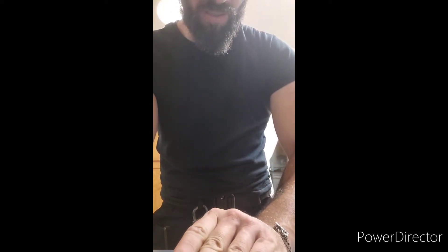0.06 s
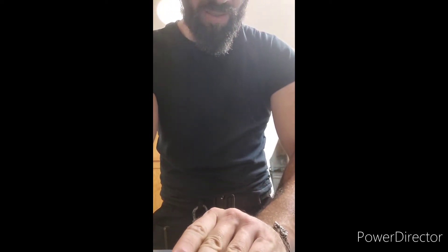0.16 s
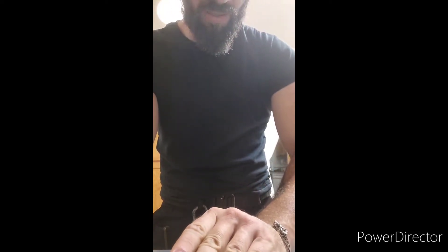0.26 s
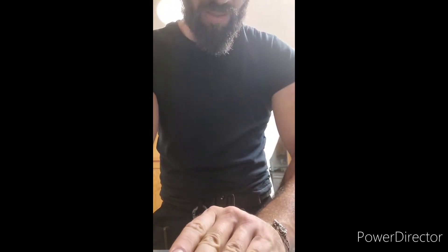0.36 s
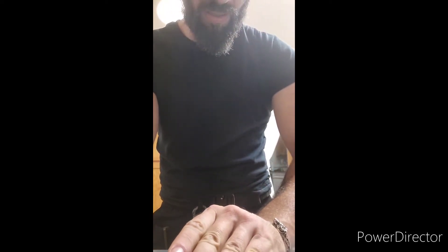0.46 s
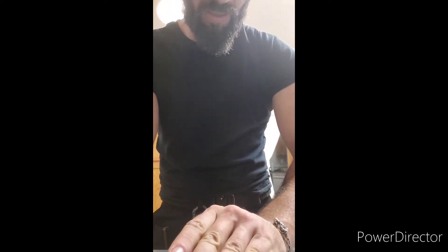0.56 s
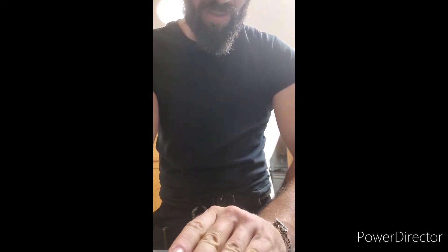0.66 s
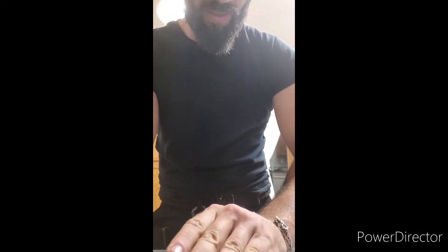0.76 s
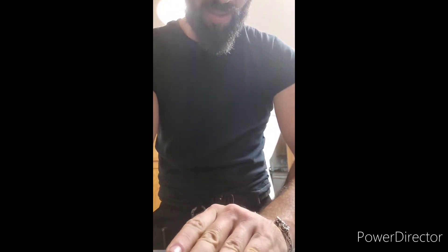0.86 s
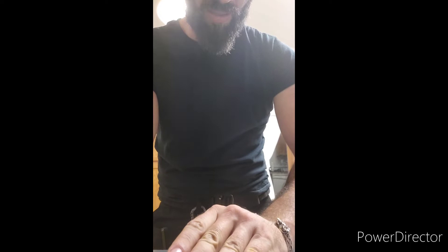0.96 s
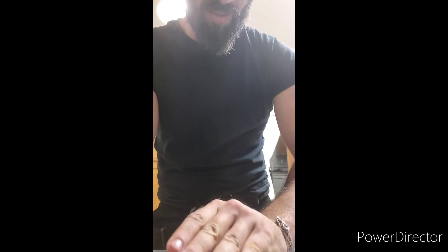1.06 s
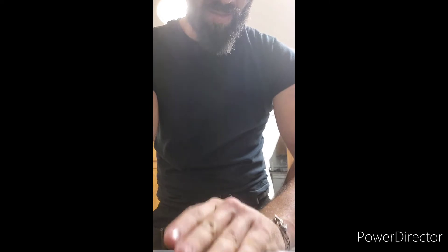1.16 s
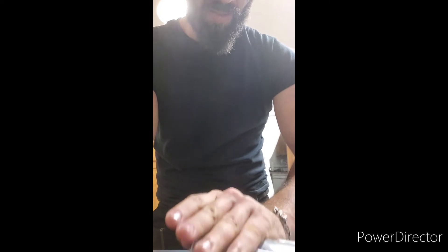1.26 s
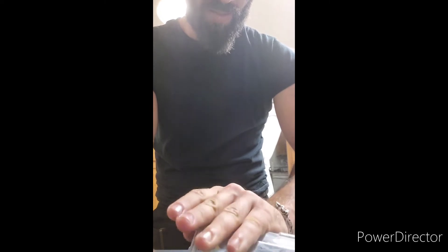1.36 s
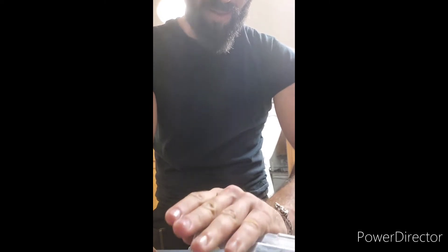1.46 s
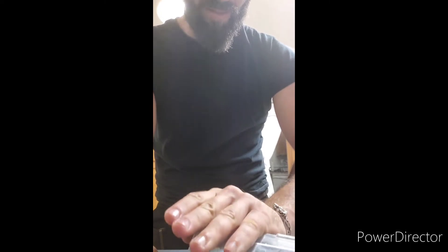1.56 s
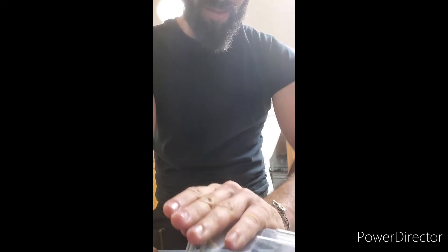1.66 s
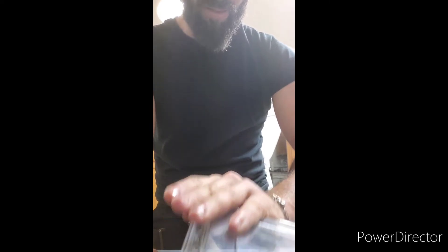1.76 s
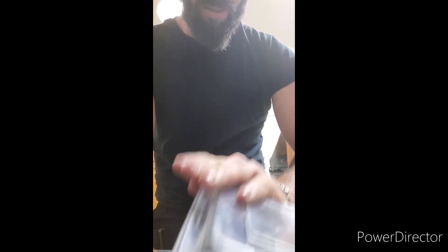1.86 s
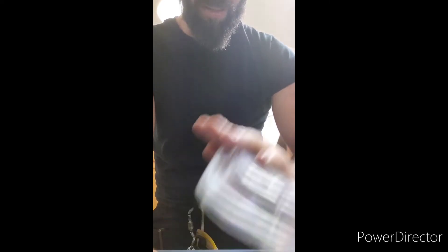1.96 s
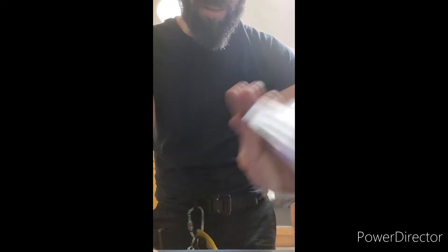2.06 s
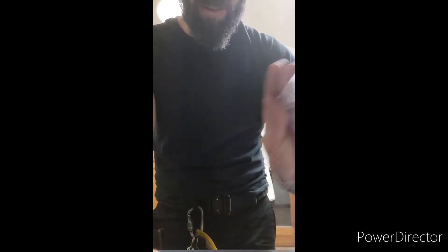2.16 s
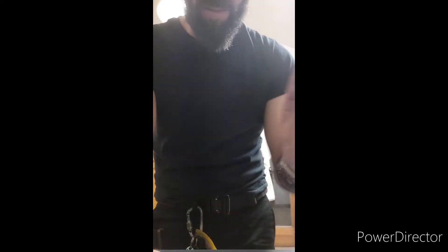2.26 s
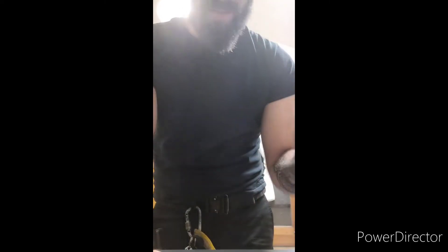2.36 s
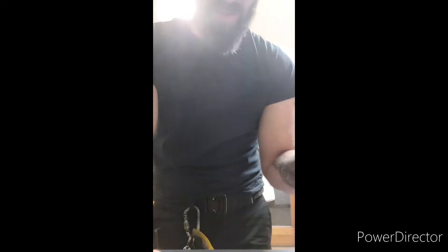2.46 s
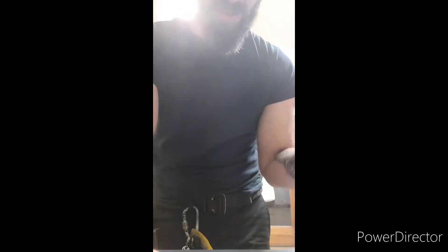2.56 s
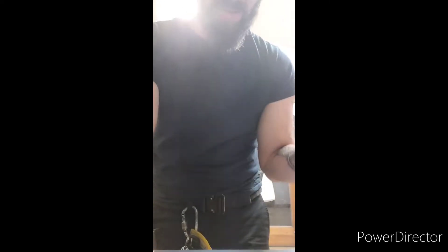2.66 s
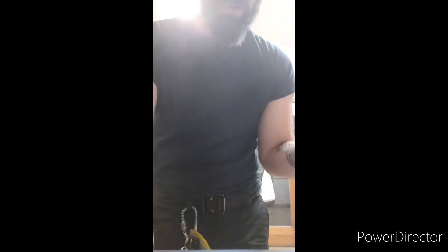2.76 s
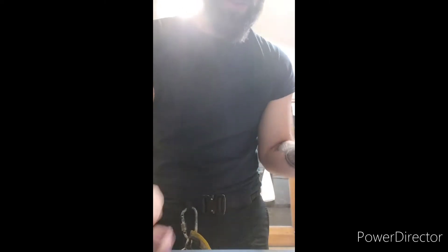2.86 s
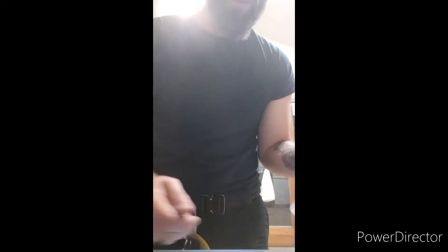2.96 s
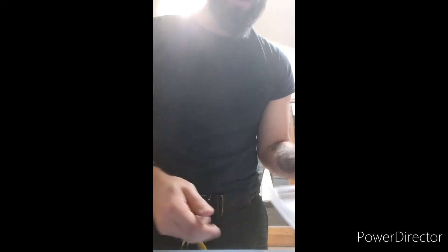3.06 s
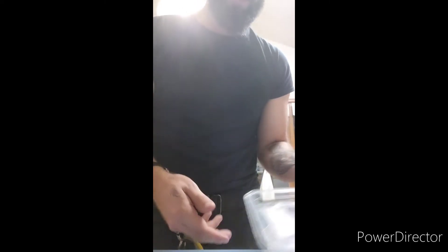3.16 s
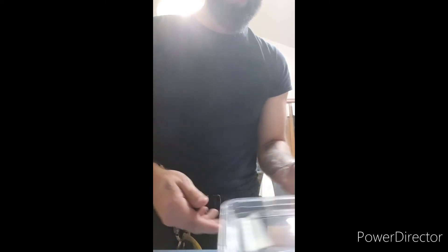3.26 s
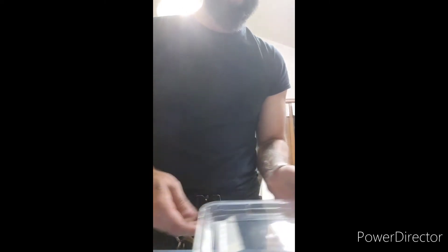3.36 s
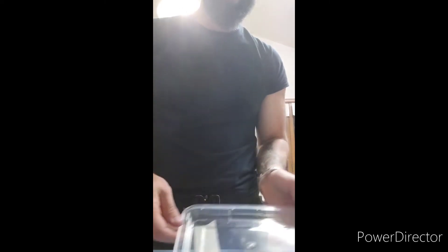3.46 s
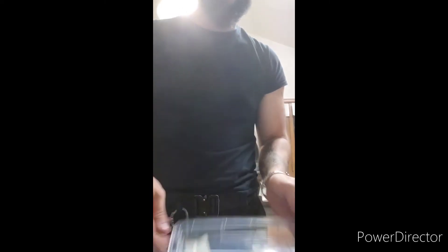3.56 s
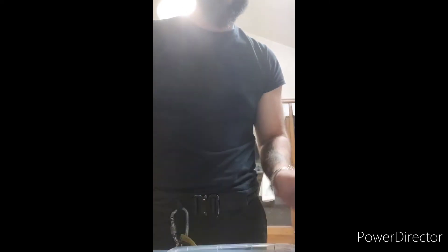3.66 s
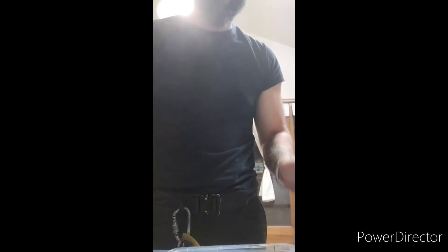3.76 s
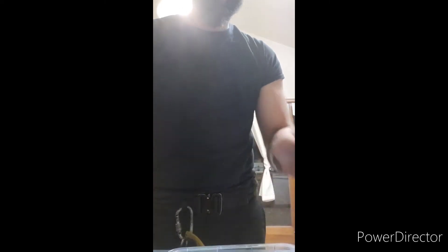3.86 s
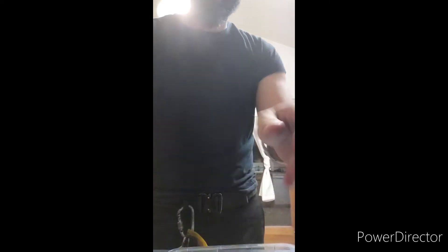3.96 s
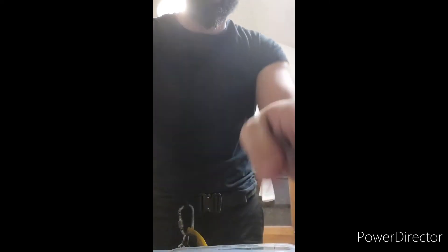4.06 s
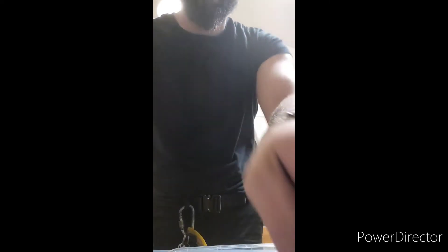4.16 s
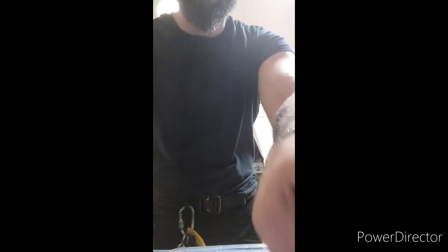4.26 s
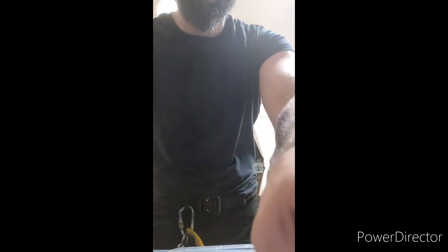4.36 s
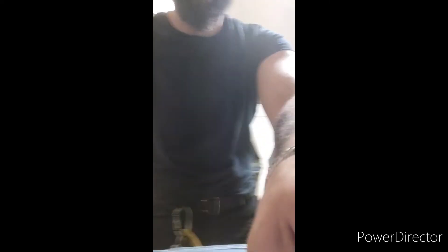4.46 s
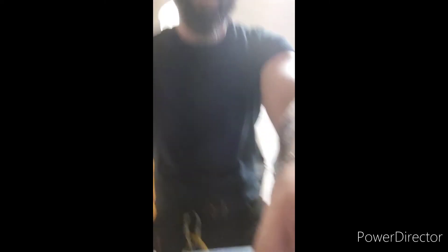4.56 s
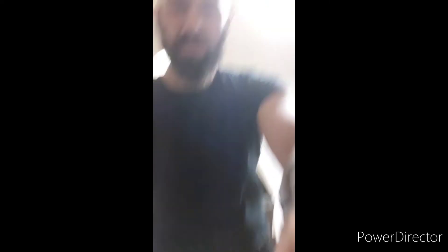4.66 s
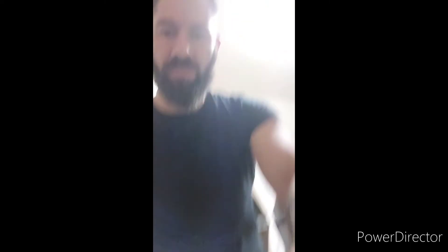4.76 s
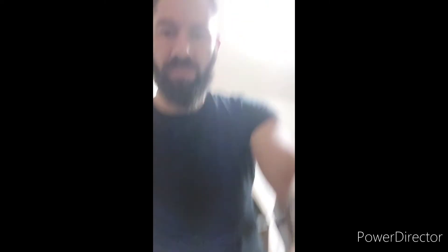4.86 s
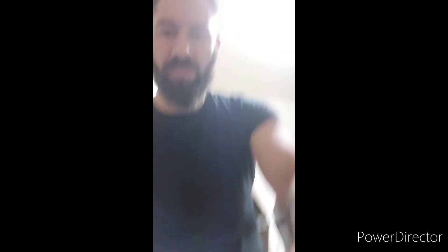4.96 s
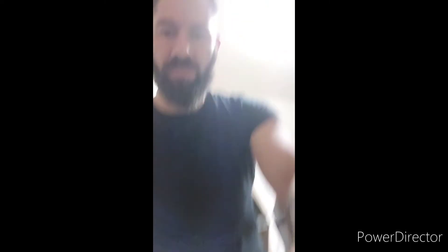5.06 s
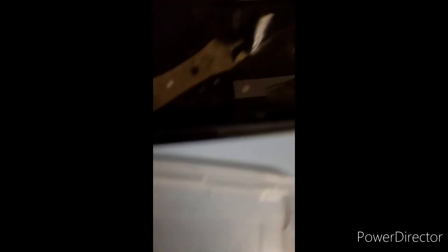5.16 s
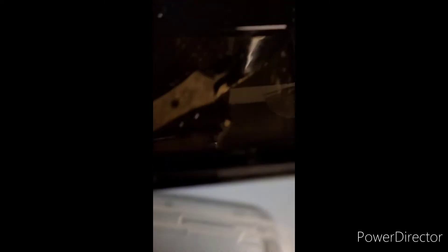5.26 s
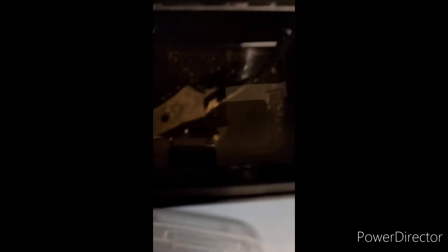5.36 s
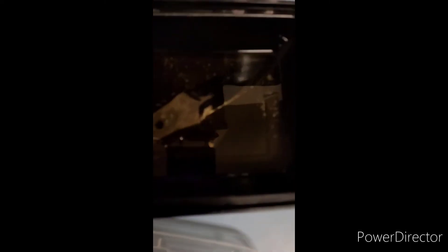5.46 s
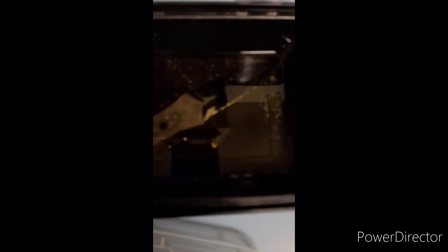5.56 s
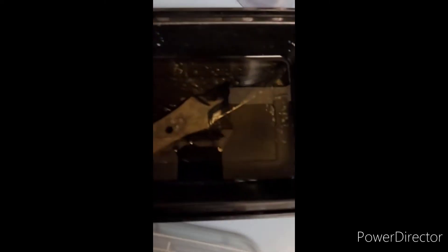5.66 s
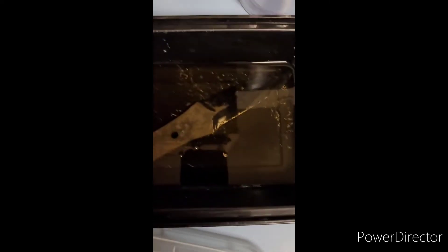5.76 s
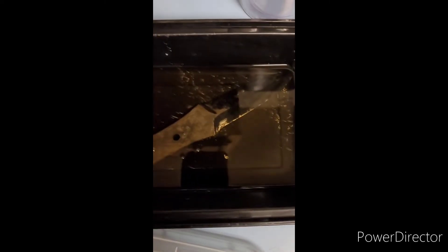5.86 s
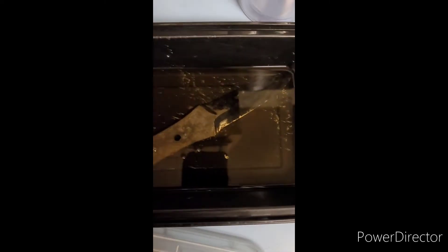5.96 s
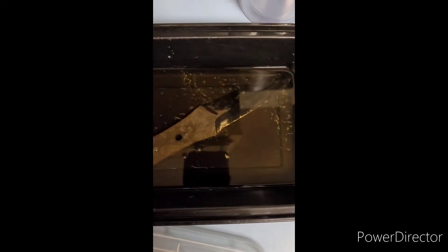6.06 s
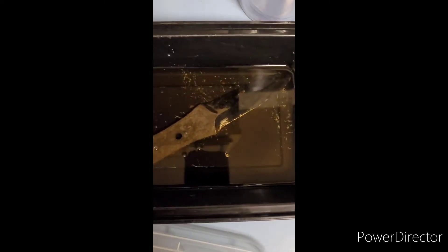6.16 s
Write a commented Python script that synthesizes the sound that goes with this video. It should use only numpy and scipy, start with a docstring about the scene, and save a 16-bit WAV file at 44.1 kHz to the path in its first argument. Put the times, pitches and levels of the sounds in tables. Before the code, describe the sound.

Brittle plastic cracks, boxy thuds and short palm squeaks come from a container opened by hand near the microphone, mostly to the right, with a short bright room echo. After the lid snaps off there are softer clatters, another tight burst of clacks, then dry, very close scratching and clicking as the phone is grabbed, fading into quiet rumble.

```python
"""In a bare room, a plastic tub is pried open by hand close to a phone: the rim cracks, the lid and walls boom
as decaying modes, and palms scrape the plastic as fluttering noise. Then a hand grips the phone: fingers rub
(noise strokes) and tick (short noise bursts with thumps) on its case by the right microphone.
Reverberation answers the tub, and a low room rumble of filtered noise lies under everything."""
import sys
import numpy as np
from scipy import signal
from scipy.fft import rfft, irfft, next_fast_len
from scipy.io import wavfile
from scipy.ndimage import uniform_filter1d, map_coordinates

SR = 44100
rng = np.random.default_rng(int(sys.argv[2]) if len(sys.argv) > 2 else 0)


def to_linear_factor(level_db):
    """Convert decibel levels (scalar or array-like) to linear amplitude factors."""
    exponent = np.asarray(level_db, float) / 20
    return 10 ** exponent


def to_wav(sig):
    """Store sig (one row per channel, or 1-D mono) as 16-bit WAV at the path in sys.argv[1].

    Samples outside -1..1 are clipped; the rate is SR.
    """
    pcm = np.clip(np.atleast_2d(sig), -1, 1) * 32767
    pcm = np.round(pcm).astype(np.int16)
    wavfile.write(sys.argv[1], SR, pcm.T)  # frames by channels


N = 273324
OPEN_S = 2.0  # the lid comes off and the walls ring higher


def unit(x):
    """Normalization: scale to rms 1."""
    return x / np.sqrt(np.mean(x ** 2) + 1e-20)


def along(points, hz):
    """Logarithmic frequency scale: (frequency [Hz], value) points joined by straight lines on it."""
    f, v = np.transpose(points)
    return np.interp(np.log(hz + 1), np.log(f + 1), v)


def curves(rows):
    """Level envelopes: gain per sample for each dB column, -120 dB outside the rows."""
    s, *columns = np.transpose(rows)
    return [to_linear_factor(np.interp(np.arange(N) / SR, s, c, -120, -120)) for c in columns]


def filtered(x, response):
    """Linear filtering: the spectrum of x times a response of frequency."""
    m = next_fast_len(x.shape[-1] + 8192)
    spectrum = rfft(x, m) * response(np.fft.rfftfreq(m, 1 / SR))
    return irfft(spectrum, m)[..., :x.shape[-1]]


def causal(db_of_hz, size=1024):
    """Minimum phase: the folded cepstrum gives an impulse response with nothing before the blow."""
    cepstrum = irfft(np.log(to_linear_factor(db_of_hz(np.fft.rfftfreq(size, 1 / SR)))))
    cepstrum[1:size // 2] *= 2
    cepstrum[size // 2 + 1:] = 0
    return irfft(np.exp(rfft(cepstrum)))


def noise(spectrum, grain_db=0, grain_hz=300):
    """Stick-slip: coloured noise of rms 1 whose level flutters at random."""
    grains = rng.standard_normal(int(N * grain_hz / SR) + 4)
    flutter = map_coordinates(grains, [np.arange(N) * grain_hz / SR])
    grainy = rng.standard_normal(N) * to_linear_factor(grain_db * flutter)
    return unit(filtered(grainy, lambda hz: to_linear_factor(along(spectrum, hz))))


def add(track, s, sound):
    """Superposition: mix a sound in from time s."""
    part = track[..., round(s * SR):][..., :sound.shape[-1]]
    part += sound[..., :part.shape[-1]]


def stroke(start, end, db_start, db_end, edge=0.012):
    """Sliding contact: the gain of one stroke, with a quick rise and fall of edge seconds."""
    held_to = max(end, start + edge)
    corners = [start, start + edge, held_to, held_to + edge]
    return np.interp(np.arange(N) / SR, corners, [0, to_linear_factor(db_start), to_linear_factor(db_end), 0])


# colour of the room tone: (frequency [Hz], relative density [dB])
RUMBLE = [(15, -63.5), (25, -43), (58, -8.5), (85, -28.5), (103, -14), (163, 1), (197, -5), (349, -7.5),
          (584, -19.5), (831, -17), (952, -21.5), (2000, -21), (6380, -22), (8600, -33), (11900, -26.5),
          (16500, -73)]
# course of the room tone: (time [s], rumble level [dB], hiss level [dB])
ROOM_TONE = [(0, -48, -67), (1.9, -51.5, -65.5), (2.9, -53, -67), (3.5, -54.5, -73.5), (4.0, -50, -64.5),
             (5.0, -51.5, -68.5), (5.65, -50, -73), (6.2, -51, -78.5)]
# left-right coherence of the room tone and the reverberation: (frequency [Hz], coherence [0 to 1])
ALIKE = [(60, 1), (500, 0.86), (1200, 0.029), (4000, 0.046)]


def room_tone():
    """Coherence of a diffuse field: distant machinery and air reach both ports nearly alike in the bass."""
    turn = lambda hz: np.arccos(np.clip(along(ALIKE, hz), 0, 1)) / 2
    mid = filtered(noise(RUMBLE), lambda hz: np.cos(turn(hz)))
    side = filtered(noise(RUMBLE), lambda hz: np.sin(turn(hz)))
    pair = np.array([mid + side, mid - side]) * to_linear_factor([[-1], [1]])
    low = filtered(pair, lambda hz: 1 / (1 + (hz / 1500) ** 4))
    rumble, hiss = curves(ROOM_TONE)  # the hiss fades as the phone turns to the table
    electronics = to_linear_factor(-87.5) * rng.standard_normal((2, N))
    return rumble * unit(low) + hiss * unit(pair - low) + electronics


# decay of the reverberation: (frequency [Hz], t60 [s])
WALLS = [(100, 0.036), (500, 0.64), (1500, 0.58), (4000, 0.55), (10000, 0.42), (15000, 0.24)]
# room level at the left port, then at the right: (frequency [Hz], level [dB])
ECHO_LEFT = [(200, -9.5), (800, -16), (2500, -17.5), (12000, -24.5)]
ECHO_RIGHT = [(200, -7), (800, -8), (2500, -17), (12000, -11)]


def room(x, size=SR // 2):
    """Reverberation: noise tails, each frequency dying at its own speed, long waves alike at both ports."""
    out = np.zeros((2, N))
    for start in range(0, N, size):  # a fresh tail every half second, since the tub moves
        hz, t, z = signal.stft(rng.standard_normal((2, SR * 5 // 8)), SR, nperseg=256)
        alike = np.clip(along(ALIKE, hz), 0, 1)[:, None]
        z[0] = alike * z[1] + np.sqrt(1 - alike ** 2) * z[0]
        decay = to_linear_factor(-60 * t / along(WALLS, hz)[:, None])
        tail = signal.istft(z * decay, SR, nperseg=256)[1]
        wet = signal.fftconvolve(x[None, start:start + size], tail / np.linalg.norm(tail[1]), axes=1)
        add(out, start / SR + .004, wet)
    return filtered(out, lambda hz: to_linear_factor([along(ECHO_LEFT, hz), along(ECHO_RIGHT, hz)]))


# finger strokes on the case: (start [s], length [s], right port [dB], left port [dB], bump [dB])
RUB = [(4.267, 0.091, -64, -77.5, -72), (4.375, 0.29, -51, -53.5, -80.5), (4.586, 0.016, -43, -38, -36.5),
       (4.609, 0.016, -22.5, -38.5, -37.5), (4.638, 0.025, -23.5, -37.5, -41),
       (4.682, 0.19, -49.5, -47.5, -55), (4.773, 0.12, -49.5, -59, -66), (4.983, 0.085, -51, -50, -54.5),
       (5.116, 0.079, -53, -56, -58.5), (5.267, 0.052, -42, -50, -51.5), (5.313, 0.16, -54.5, -53, -85),
       (5.481, 0.13, -62.5, -61.5, -84), (5.768, 0.17, -72.5, -56.5, -67.5)]
# colour of the case at each port, and of the phone shifting in the grip: (frequency [Hz], relative level [dB])
RUB_RIGHT = [(600, -8), (2000, -11), (3500, -4.5), (7300, 0.5), (8700, -10.5), (11000, -6.5), (15500, -9),
             (15900, -39)]
RUB_LEFT = [(60, 3), (300, 23), (1500, 16.5), (4000, 10), (8000, -52), (16000, -42)]
BUMP = [(20, -16.5), (55, 5), (90, -3.5), (300, -5), (1000, -59.5)]


def finger_rubs():
    """Structure-borne friction: rubbing enters each port dry and unrelated; the bump is common to both."""
    right_fade_db, left_fade_db = 1, 5  # loss over one stroke
    gritty_db = -47  # strokes lighter than this glide more smoothly
    right = sum(stroke(s, s + length, db, db - right_fade_db, edge=0.0074) for s, length, db, _, _ in RUB)
    left = sum(stroke(s, s + length, db, db - left_fade_db, edge=0.012) for s, length, _, db, _ in RUB)
    bump = sum(stroke(s, s + length, db, db, edge=0.021) for s, length, _, _, db in RUB)
    left_grain_db = 4.2 * np.minimum(left / to_linear_factor(gritty_db), 1)
    left_rub = left * noise(RUB_LEFT, grain_db=left_grain_db, grain_hz=162.0)
    right_rub = right * noise(RUB_RIGHT, grain_db=1.5, grain_hz=324)
    return np.array([left_rub, right_rub]) + bump * noise(BUMP) * to_linear_factor([[-3], [2]])


# finger ticks on the case: (time [s], level [dB], thump re tick [dB], left-right balance [dB])
TICKS = [(4.5, -25.5, -12.5, 13), (4.5949, -22.5, 1, -25), (4.6165, -12, -23.5, -44), (4.7031, -39, 19, 17),
         (4.7708, -50.5, 22.5, -9), (4.7752, -53.5, 25.5, -7.5), (4.788, -55.5, 21.5, -7),
         (5.336, -51.5, 14.5, -7), (5.3571, -34.5, -3, -6.5), (5.397, -26.5, -40, -13)]
# the grip settles in a run of ticks that fades overall, with uneven levels: (time [s])
SETTLING_S = [5.425, 5.4507, 5.489, 5.515, 5.5282, 5.567, 5.6219]


def finger_ticks():
    """Impact excitation: a short noise burst at each port, over decaying notes of the case common to both."""
    settle_db, fade_db_per_s, settle_thump_db, settle_pan_db = -31.5, 73, -27, -6
    chatter_s, chatter_db = 0.015, -7  # a weaker slip follows within this time
    out, t = np.zeros((2, N)), np.arange(SR // 20) / SR
    colour = causal(lambda f: along(RUB_RIGHT, f))
    settling = []
    for s in SETTLING_S:
        db = settle_db - fade_db_per_s * (s - SETTLING_S[0]) + rng.normal(0, 2.5)
        settling.append((s, db, settle_thump_db, settle_pan_db))
    # the last two ticks and every settling tick chatter
    settling += [(s + rng.uniform(0.43, 1) * chatter_s, db + chatter_db, *rest)
                 for s, db, *rest in TICKS[-2:] + settling]
    for s, db, thump_db, pan_db in TICKS + settling:
        burst = rng.standard_normal((2, len(t))) * np.exp(-t / 0.00041)
        tick = signal.fftconvolve(burst, colour[None], axes=1)[:, :len(t)]
        tick[0] = uniform_filter1d(tick[0], size=4)  # the far port hears it duller
        dull = unit(uniform_filter1d(rng.standard_normal(len(t)), size=40))
        thump = to_linear_factor(thump_db - 9.0) * dull * np.exp(-t / 0.003) / 2
        thump += to_linear_factor(-15) * np.sin(2 * np.pi * 1650 * t) * np.exp(-t / 0.0017)  # the case's own note
        # the back plate's dull knock and its overtone
        thump += to_linear_factor(thump_db + 2) * np.sin(2 * np.pi * 350 * t) * np.exp(-t / 0.0023)
        thump -= to_linear_factor(thump_db - 5.0) * np.sin(2 * np.pi * 700 * t) * np.exp(-t / 0.00085)
        sides = to_linear_factor([[pan_db], [0]]) / (1 + to_linear_factor(pan_db)) * 2
        add(out, s, to_linear_factor(db) * (sides * tick / np.abs(tick).max() + thump))
    return out


# a dry fingertip drags over the ribbed wall, all rasp: (start [s], length [s], level at its end [dB])
SCRAPE = (3.062, 0.048, -41)


def scrape(skin):
    """Resonant friction: skin noise through two upper tub modes, its level jumping as it crosses the ribs."""
    s, length, db = SCRAPE
    modes = lambda f: sum(1 / (1 + ((f - c) * t60 / 2.6) ** 2) for c, _, t60 in TUB[-4:-2])
    ribs = unit(filtered(skin, lambda f: modes(f) + 0.23))
    jumps = to_linear_factor(5.7 * rng.standard_normal(N // 128 + 1)).repeat(128)[:N]
    return stroke(s, s + length, db - 6.5, db, edge=0.0037) * ribs * jumps


# palms sliding on the plastic: (start [s], length [s], hiss level [dB], thud level [dB])
PALMS = [(1.129, 0.023, -41, -25), (1.471, 0.036, -48, -46), (1.521, 0.048, -35, -27),
         (1.595, 0.0078, -60, -44), (1.688, 0.021, -42, -35), (2.037, 0.05, -54.5, -53.5),
         (2.101, 0.024, -44.5, -44), (2.166, 0.07, -53, -60.5), (2.571, 0.042, -56, -52.5),
         (2.665, 0.088, -55, -45), (2.758, 0.029, -64, -39.5), (2.811, 0.07, -52.5, -58.5),
         (2.936, 0.027, -53, -45.5), (3.057, 0.049, -43, -44), (3.358, 0.41, -61, -63),
         (3.729, .011, -56, -39.5)]


def palms():
    """Friction-driven resonance: sliding skin rasps and hisses in the crack's colour and shakes the modes."""
    firm_db, rasp_grows = -39, 2.06  # hiss level where the rasp equals it; the rasp grows faster with pressure
    body = lambda f: sum(to_linear_factor(db) * 1j * f * 3 / t60 / (c * c - f * f + 1j * f * 3 / t60) for c, db, t60 in TUB)
    body_treble = lambda f: .5 * np.abs(body(f)) * (f > 1800) * to_linear_factor(17.5)
    skin = noise(SNAP, grain_db=2.5, grain_hz=415)
    rasp = unit(filtered(skin, lambda f: (1 + body_treble(f)) / (1 + (f / 4000) ** 2)))
    hiss = unit(filtered(skin, lambda f: 1 - 1 / (1 + (f / 8000) ** 2)))
    thud = unit(filtered(rng.standard_normal(N), body))
    out = scrape(skin)
    for s, length, db, thud_db in PALMS:
        rasp_db = firm_db + rasp_grows * (db - firm_db)
        out += stroke(s, s + length, 0, 0) * (to_linear_factor(rasp_db) * rasp + to_linear_factor(db) * hiss + to_linear_factor(thud_db) * thud)
    return out


# free modes of the tub: (frequency [Hz], level [dB], t60 [s])
TUB = [(70, 5, 0.16), (113.5, -4, 0.05), (170, -3.5, 0.092), (219.4, 1.5, 0.017), (241.4, 11.5, 0.05),
       (280.2, -4, 0.12), (430, -6.5, 0.027), (433, -18, 0.22), (449, 5, 0.046), (471, -17.5, 0.22),
       (529, -15.5, 0.011), (724, -1, 0.043), (796, 0, 0.03), (889, 2, 0.027), (1054, -0.5, 0.022),
       (1574, -14.5, 0.032), (2160, -19, 0.01), (2940, -16, 0.0098), (4080, -16.5, 0.017),
       (5470, -13.5, 0.013)]
# colour of a crack at the right microphone: (frequency [Hz], level [dB])
SNAP = [(60, -57.5), (300, -9.5), (900, -4), (1600, 6), (2200, 14), (3200, 8.5), (4500, 5.5), (6000, 4),
        (7500, -1.5), (8700, -13.5), (10500, 1), (13000, 1.5), (15000, -9), (16300, -44)]
# the rim lets go with a crack:
# (time [s], crack level [dB], treble tilt [dB per octave], lid ring [dB], thrown into the room [dB])
SNAPS = [(0.7024, 1.5, 6, -4.5, 6), (1.258, -2, -10, -16.5, -17), (1.283, -6.5, -10.5, -12, -4),
         (1.5289, -11.5, 13, -18, -10), (1.5464, -5, -5, -12, -14), (1.6164, -1, -7, -53, -11.5),
         (1.6233, -5, -7.5, -18, -14), (1.8491, -15, -5.5, -17, -14.5), (2.1156, -28.5, -16, -23, 13.5),
         (2.2209, -18.5, -13, -22, -6), (2.299, 4, 14, 0.5, 6), (3.728, -17, -7, -25.5, 8),
         (3.741, -22.5, -1, -28.5, -3), (3.7607, 2.5, -7, -9, 9), (3.767, 2.5, -2, -9.5, -15),
         (3.7832, -15, -1, -23.5, 4.5), (3.812, -23, -6, -17.5, 11.5), (3.935, -24, -7, -31, -5),
         (4.0929, -34.5, -2, -59, -1)]
# hands and table knock the body:
# (time [s], contact level [dB], wall boom [dB], hollow [dB], lid ring [dB])
KNOCKS = [(1.1444, -7, -13, -26, -6.5), (1.15, -21, 2, -7, -17), (1.1985, -18, -38, -21, -16.5),
          (1.3518, -0.5, -3.5, -1, -1.5), (1.5567, -7, -12.5, -15, -22.5), (1.57, -16.5, -16, -26, -21),
          (1.629, -35, -15.5, -25, -19), (1.706, -32, -27.5, -35.5, -23), (2.148, -34, -34.5, -48, -50),
          (2.27, -37, -37, -39, -26.5), (2.309, -31, -11, -26, -18), (2.339, 1, -16, -17, -8),
          (2.346, -6.5, -10.5, -42, -10), (2.377, -37, -26, -25, -24), (2.3938, -15.5, -29, -24, -17.5),
          (2.411, -39, -28, -43, -19), (2.664, -35.5, -36, -46, -30), (2.7108, -20.5, -29, -45, -31),
          (2.734, -30, -27, -52, -24), (2.7807, -26.5, -26.5, -44, -22), (2.9477, -59, -33.5, -44, -37),
          (3.6226, -12, -36.5, -32, -3.5), (3.715, -10.5, -24.5, -41, -25), (3.8194, -10, -25, -25.5, -15)]
# as the hands bend and hold the lid:
# (time [s], loudest region [Hz], ring length re free [ratio], middle of a crack [dB], edge ring [dB])
GRIP = [(0.7, 794, 0.75, -7.5, 2.5), (1.14, 678, 1.77, -2, -5), (1.26, 730, 0.62, -10, -14.5),
        (1.35, 767, 0.88, -11, -5.5), (1.6, 773, 0.59, -14, -15.5), (1.85, 656, 0.99, -4.5, -6),
        (2.301, 919, 1.1, -1, 7), (2.78, 912, 0.54, -3, -1.5), (3.62, 1109, 0.47, 7, 16.5),
        (3.71, 700, 1.1, 2, 3.5), (3.77, 770, 0.85, -5, 2)]
# lift of the two middle edge modes, the others moved oppositely: weakened closed, favoured open:
# (closed [dB], open [dB])
EDGE_LIFT_DB = (-7.5, 9.5)


def tub():
    """Modal excitation: bursts of tearing clicks ring the walls (low modes) and the lid near the blow.

    Returns the sound toward the phone and its average over all directions, which is what fills the room."""
    # each pair is (closed, open); a crack at the rim hardly reaches walls and hollow
    walls_under_lid_db, hollow_under_lid_db = (11, 12), (14, 14.5)
    knock_tilt_db, knock_room_db = (-1.5, -3.5), (-1.5, -1.5)  # tilt per octave, thrown into the room
    out, t = np.zeros((2, N)), np.arange(SR // 4) / SR
    hz, level, t60 = np.transpose(TUB)[:, :, None]
    grip_s, *grip = np.transpose(GRIP)
    near = lambda centre_hz: -38 * np.minimum(np.abs(np.log2(hz / centre_hz)), .5)  # modes by the blow ring most
    blows = [(s, db, lid_db - walls_under_lid_db[s > OPEN_S], lid_db - hollow_under_lid_db[s > OPEN_S],
              lid_db, tilt_db, room_db) for s, db, tilt_db, lid_db, room_db in SNAPS]
    blows += [(*row, knock_tilt_db[row[0] > OPEN_S], knock_room_db[row[0] > OPEN_S]) for row in KNOCKS]
    for s, db, wall_db, hollow_db, lid_db, tilt_db, room_db in blows:
        lid_hz, held, middle_db, edge_db = (np.interp(s, grip_s, c) for c in grip)
        middle = lambda f: middle_db * np.exp(-np.log2(f / 2400 + 1e-9) ** 2 / 0.48)
        tilt = lambda f: tilt_db * np.clip(np.log2(f / 5500 + 1e-9), 0, 1)
        colour = causal(lambda f: along(SNAP, f) + middle(f) + tilt(f))

        # the first click leads, then clicks inside the tear
        burst = rng.standard_normal(len(t)) * (np.exp(-t / 0.0032) + np.exp(-t / 0.00015))
        burst *= to_linear_factor(2.7 * rng.standard_normal(len(t) // 16 + 1)).repeat(16)[:len(t)]
        crack = signal.fftconvolve(burst, colour)[:len(t)]
        smooth = np.pad(colour, (0, len(t) - len(colour))) * np.linalg.norm(burst) * to_linear_factor(room_db)
        contact = np.array([crack, smooth]) / (0.33 * np.linalg.norm(crack))

        walls = wall_db + near(200 if s < OPEN_S else 285) + (hz < 130) * (-21 if s < OPEN_S else 4)
        lift_db = EDGE_LIFT_DB[s > OPEN_S] * np.select([hz < 1900, hz < 3500], [-1, 1], -1)
        drive = np.select([hz < 350, hz < 600, hz < 1300],
                          [walls, hollow_db + 0 * hz, lid_db + near(lid_hz)], db + edge_db + lift_db)
        strength = level + drive + rng.normal(0, 2.23, hz.shape)
        life = t60 * np.where(hz > 350, max(held, .1), 1)  # the grip spares the wall modes
        swing = np.sin(2 * np.pi * hz * (1 + rng.normal(0, .014, hz.shape)) * t)
        ring = (to_linear_factor(strength - 60 * t / life) * swing).sum(axis=0) * (1 - np.exp(-t / 0.0016))
        add(out, s, to_linear_factor(db) * contact + ring * to_linear_factor([[0], [0.39 * room_db - 7]]))
    return out


# left port re right: (frequency [Hz], level [dB])
SHADOW = [(100, -5), (500, -8), (1500, -8), (3000, -8), (5000, -16.5), (9000, -14), (13000, -28.5)]


def shaded(x, size=SR // 4):
    """Diffraction: the left port hears the tub later, duller and scattered by the hand, anew as it moves."""
    out, shadow = np.zeros(N), causal(lambda f: along(SHADOW, f))
    for start in range(0, N, size):
        scatter = np.diff(rng.standard_normal(401)) * np.exp(-np.arange(400) / 90) * .13  # mostly short waves
        scatter[5] += 1  # direct sound, five samples late
        add(out, start / SR, signal.fftconvolve(x[start:start + size], np.convolve(scatter, shadow)))
    return out * to_linear_factor(np.where(np.arange(N) < OPEN_S * SR, -1.5, 1))  # the tub swings toward the middle once open


def scene():
    """Superposition of direct, reverberant and structure-borne sound; the tub is nearer the right port."""
    near, spread = tub() + palms() * to_linear_factor([[0], [-4]])  # hands shield their own noise from the room
    direct = to_linear_factor(-2.0) * np.array([shaded(near), near])
    return direct + room(spread) + finger_rubs() + finger_ticks() + room_tone()


def low_pass(x):
    """Removes everything above the highest recorded frequency."""
    return signal.sosfilt(signal.butter(12, 16730, fs=SR, output="sos"), x)


def record(dry):
    """High-pass filtering and saturation: the phone cuts the deepest bass and rounds off the highest peaks."""
    ceiling = 0.82  # amplitude that rounded peaks approach
    bass_cut = signal.butter(3, 45, "high", fs=SR, output="sos")
    x = signal.sosfilt(bass_cut, dry)
    mix = x / (1 + np.abs(x / ceiling) ** 6) ** (1 / 6)
    return low_pass(mix)


dry = scene()
out = record(dry)
to_wav(out)
```